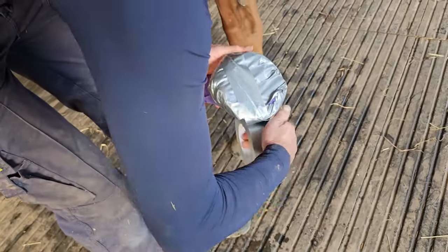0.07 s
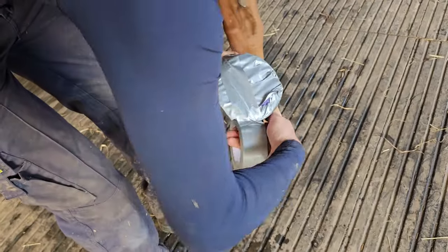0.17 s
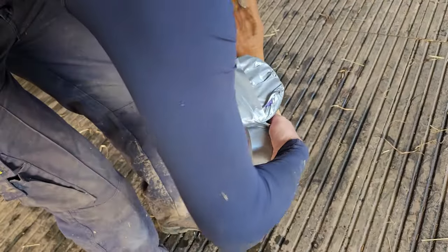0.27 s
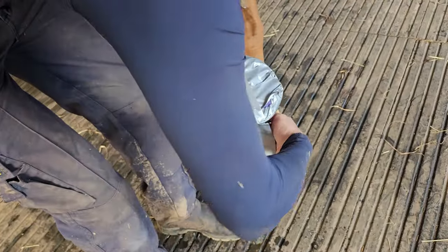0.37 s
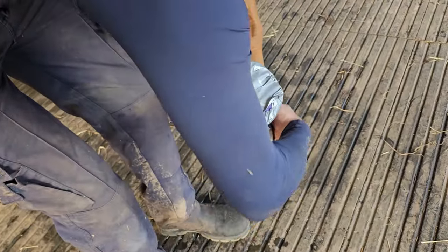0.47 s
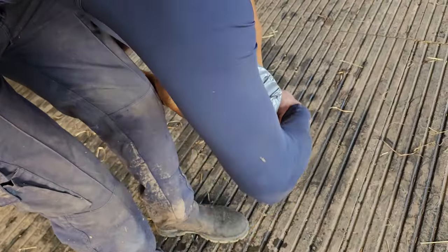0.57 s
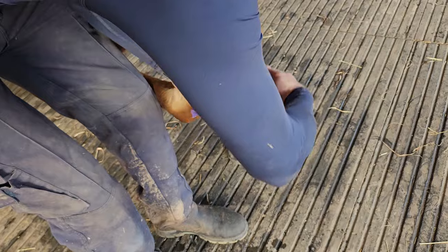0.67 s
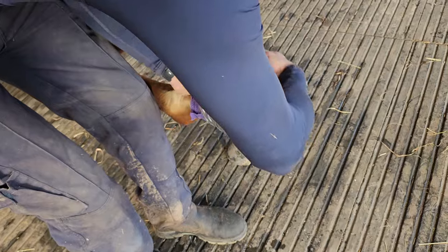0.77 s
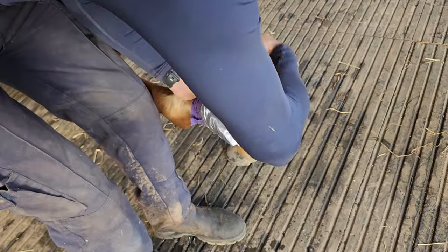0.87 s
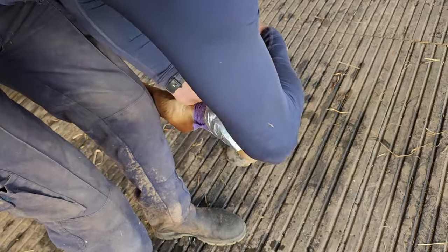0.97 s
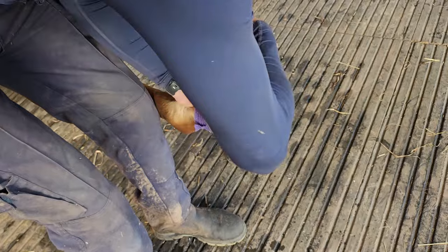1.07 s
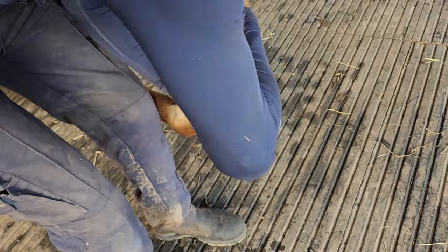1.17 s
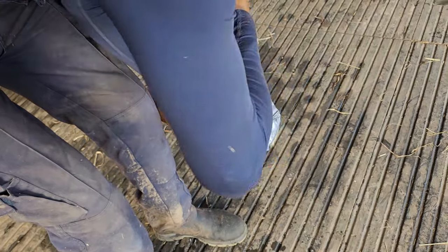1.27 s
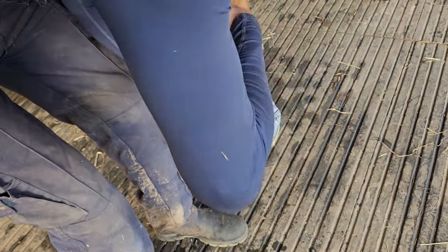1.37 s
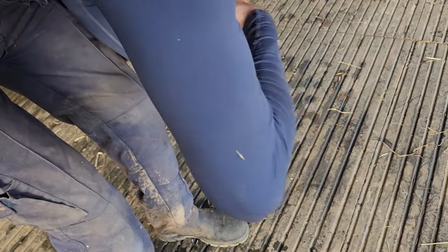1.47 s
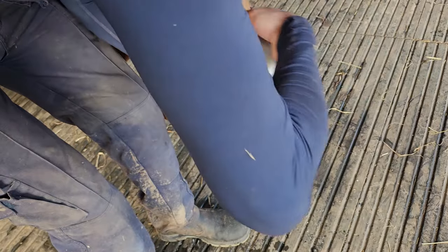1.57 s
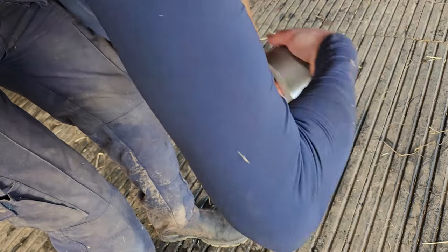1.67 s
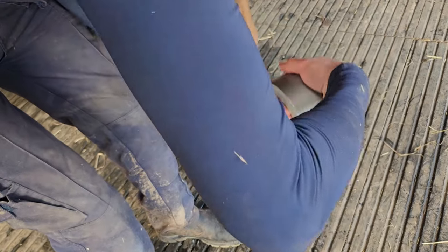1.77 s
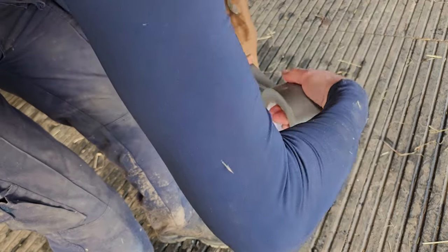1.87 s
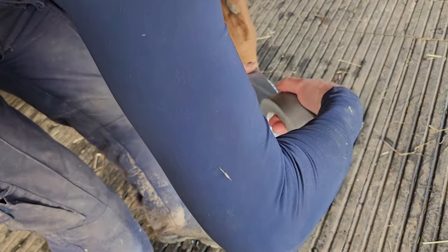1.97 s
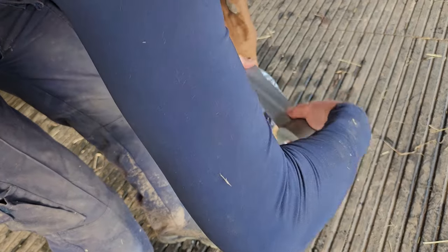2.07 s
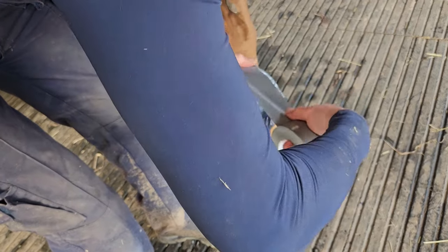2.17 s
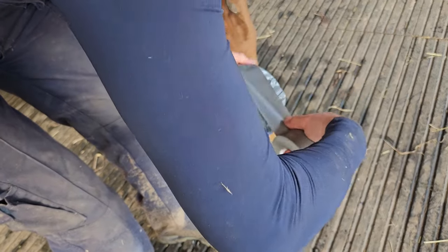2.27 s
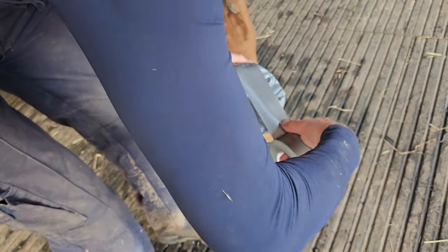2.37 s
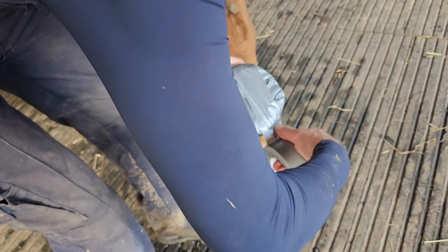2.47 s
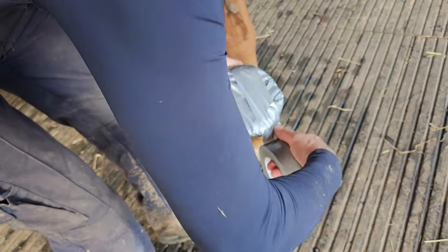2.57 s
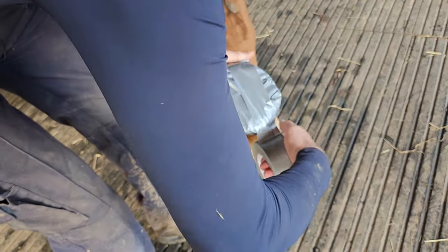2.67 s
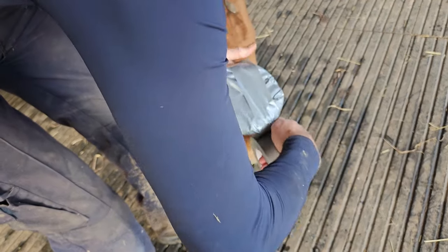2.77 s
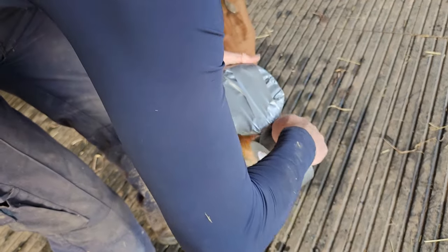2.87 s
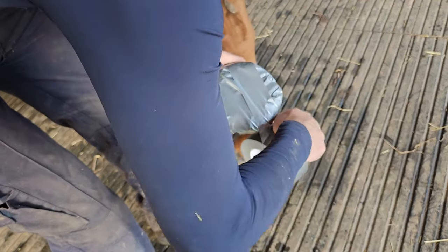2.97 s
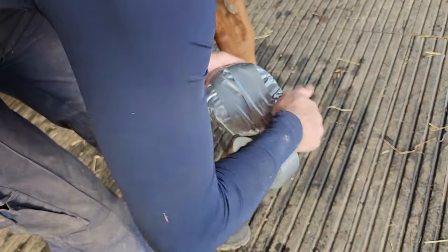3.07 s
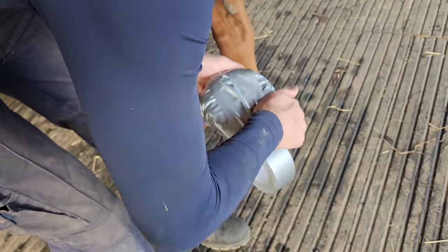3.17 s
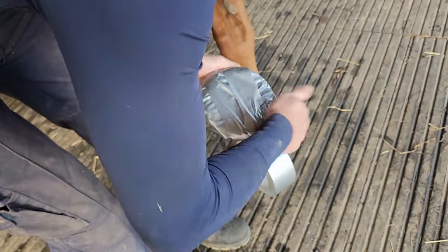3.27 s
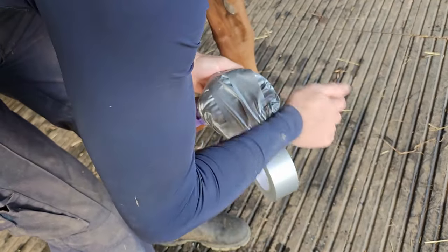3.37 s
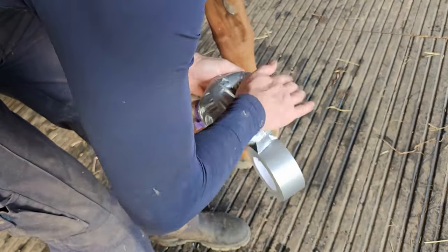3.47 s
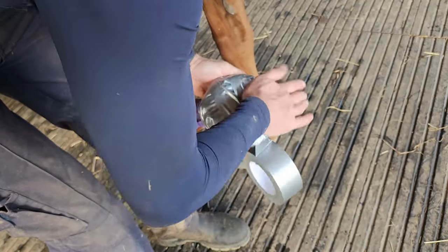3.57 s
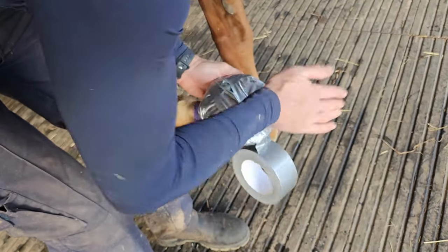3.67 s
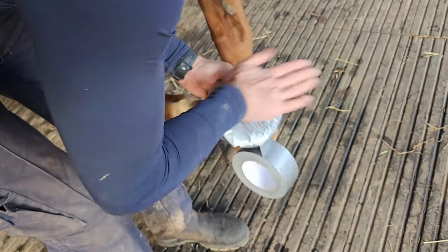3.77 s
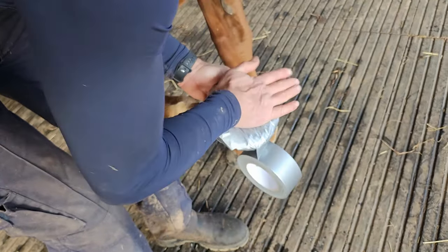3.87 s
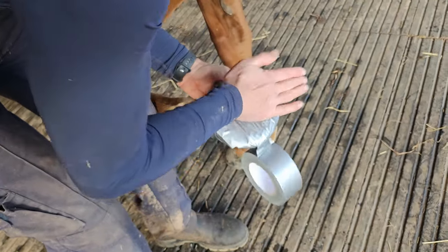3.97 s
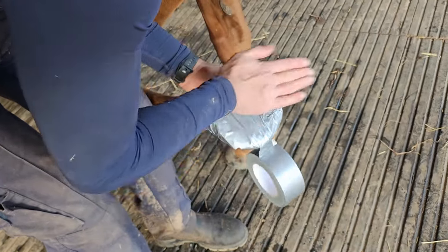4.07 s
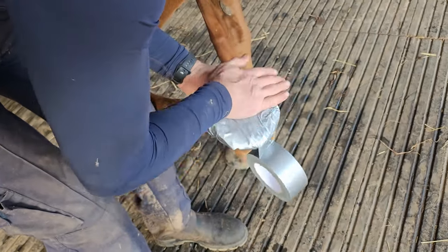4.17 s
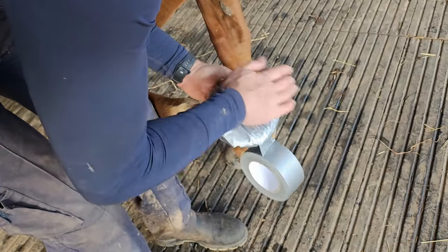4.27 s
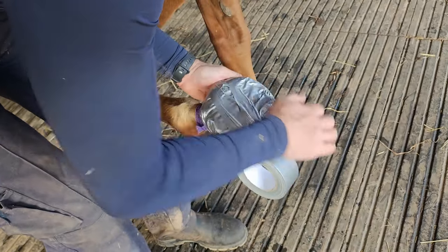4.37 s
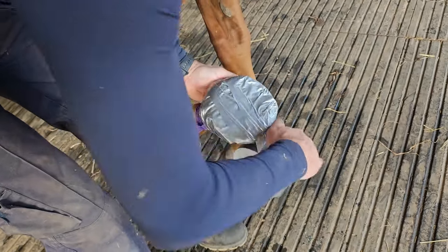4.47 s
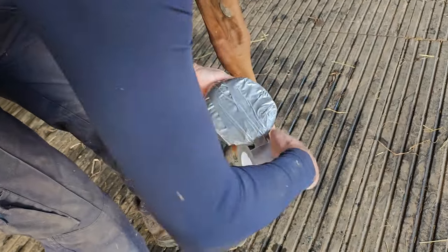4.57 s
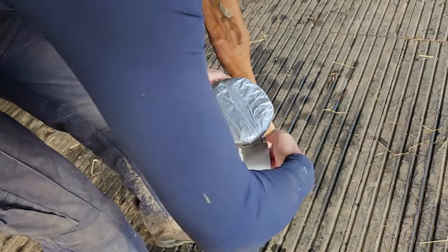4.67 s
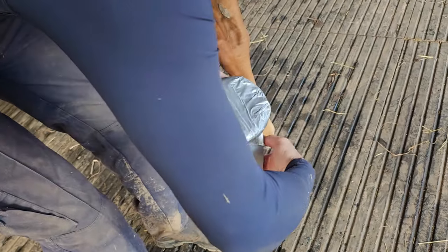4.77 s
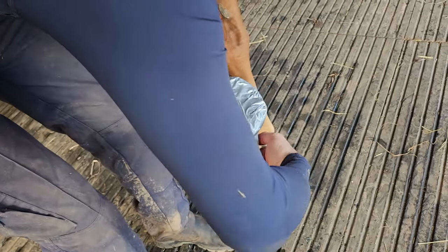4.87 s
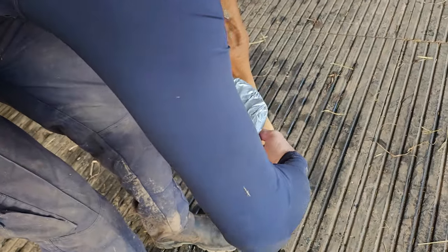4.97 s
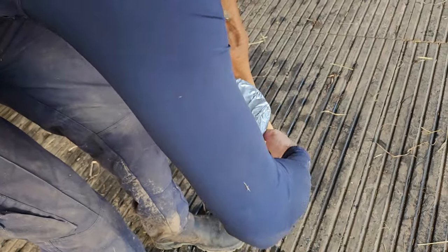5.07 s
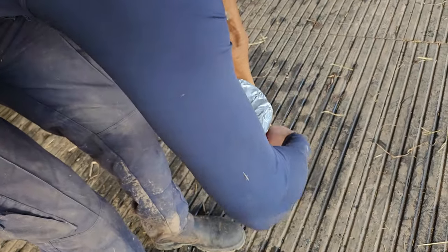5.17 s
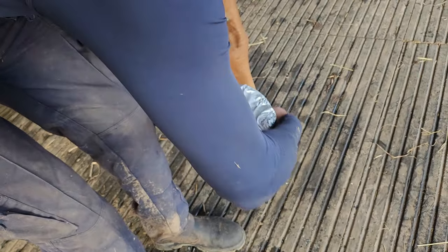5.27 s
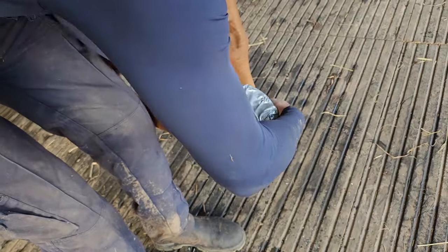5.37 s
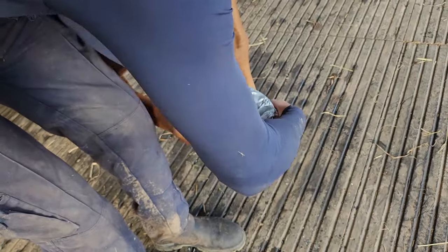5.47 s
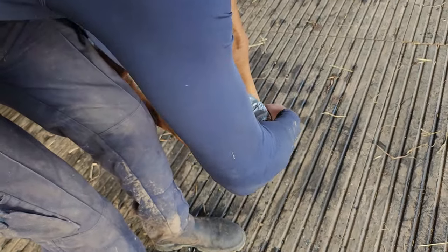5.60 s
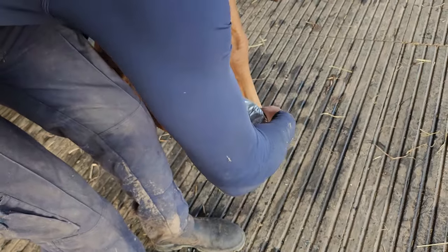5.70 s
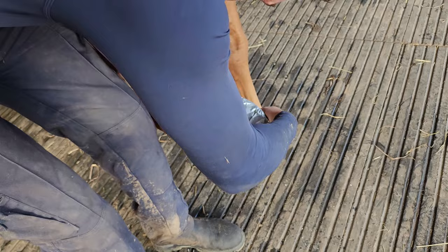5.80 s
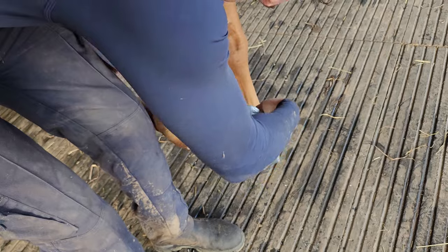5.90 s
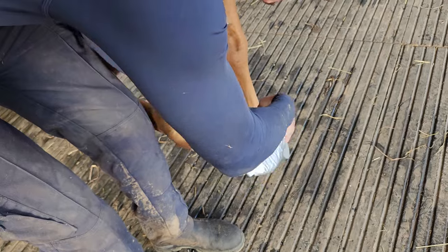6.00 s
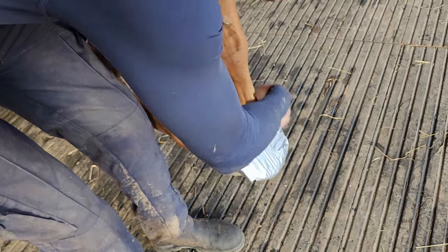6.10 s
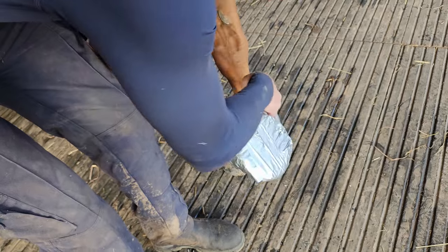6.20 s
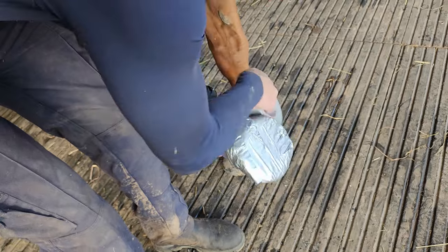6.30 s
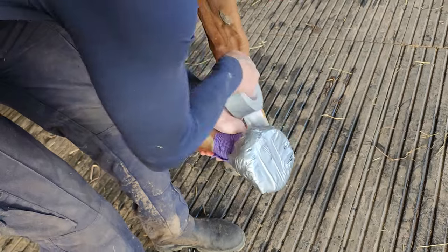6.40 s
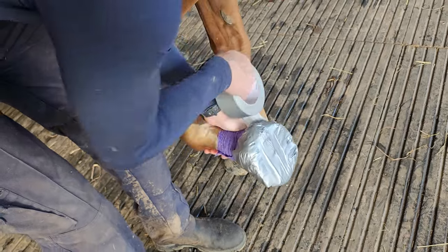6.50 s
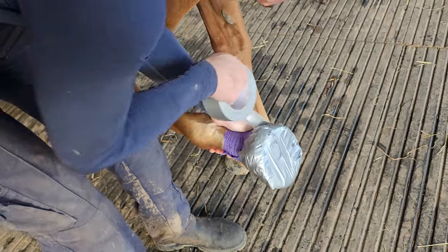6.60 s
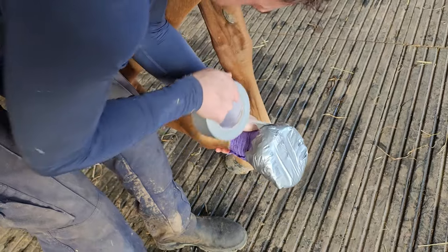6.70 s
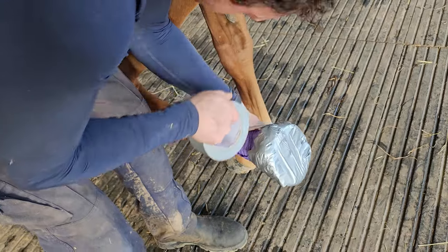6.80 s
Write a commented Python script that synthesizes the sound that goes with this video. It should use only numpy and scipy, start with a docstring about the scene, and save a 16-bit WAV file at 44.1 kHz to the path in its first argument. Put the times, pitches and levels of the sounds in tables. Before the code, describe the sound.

Duct tape is pulled off a roll in short rasping strips and wound around a horse's hoof, with a few palm pats.

```python
"""Rasping strips of duct tape are pulled off the roll and wound round a horse's hoof, close by in a stable.
The glue lets go by stick-slip: each slip plucks the taut strip, shakes the hollow roll and snaps a spray
of glue threads. Between pulls the tape crinkles, a palm pats it down on the hoof, fingers rub and
sleeves rustle. The stable reverberates over a faint hush from the yard."""
import sys
import numpy as np
from scipy import signal
from scipy.fft import rfft, irfft
from scipy.io import wavfile

SR = 44100
rng = np.random.default_rng(int(sys.argv[2]) if len(sys.argv) > 2 else 0)


def digitize_waveform(pressure):
    """Quantize a signal to 16-bit integers and store it at the path in sys.argv[1].

    Rows of a 2-D input are taken as channels; values are limited to [-1, 1].
    """
    field = np.atleast_2d(pressure).T
    bounded = np.clip(field, -1, 1)
    quanta = np.round(bounded * 32767).astype(np.int16)
    wavfile.write(sys.argv[1], SR, quanta)


N = 301644


def amp(db):
    return 10 ** (np.asarray(db) / 20)


def read(points, hz):
    """Interpolation of a curve along a logarithmic frequency axis."""
    freqs, values = np.transpose(points)
    return np.interp(np.log(hz + 1), np.log(freqs + 1), values)


def unit_rms(x):
    return x / np.sqrt(np.mean(x ** 2) + 1e-20)


def add(mix, start_s, sound):
    """Superposition: a sound joins the mix at start_s."""
    part = mix[:, max(round(start_s * SR), 0):][:, :sound.shape[1]]
    part += sound[:, :part.shape[1]]


def colour(x, spectrum, size=2048):
    """Minimum-phase filtering shapes the spectrum while clicks keep their sharp front."""
    log_gain = np.log(amp(read(spectrum, abs(np.fft.fftfreq(size, 1 / SR)))))
    taps = np.fft.ifft(np.exp(np.conj(signal.hilbert(log_gain)))).real[:size // 2]
    return signal.fftconvolve(x, taps[None], axes=1)[:, :x.shape[1]]


def noise(length, spectrum):
    """Filtered white noise in two rows: mid and side, like all sources here."""
    return colour(rng.standard_normal((2, length)), spectrum)


def wander(length, per_s):
    """Random modulation: straight lines between Gaussian values, per_s of them a second."""
    at = np.arange(length) * per_s / SR
    count = int(at[-1]) + 2
    return np.interp(at, np.arange(count), rng.standard_normal(count))


def resonate(x, hz, width_hz):
    """A damped resonator whose natural frequency follows the curve hz."""
    phasor = np.exp(2j * np.pi * np.cumsum(hz) / SR)
    pole = np.exp(-np.pi * width_hz / SR)
    return 2 * (phasor * signal.lfilter([1 - pole], [1, -pole], x / phasor + 1e-18)).real


def comb(x, lag_s, strength, count=1):
    """Interference with ever fainter repeats at a moving delay makes a sliding comb filter."""
    index = np.arange(x.shape[1])
    delayed = lambda lag: np.array([np.interp(index - lag * SR, index, row, left=0) for row in x])
    return x + sum(strength ** k * delayed(k * lag_s) for k in range(1, count + 1))


def spray(kicks, decay_s, smooth, grain_db=2.5):
    """Exponential decay: each kick leaves a cloud of tiny snaps; the share smooth of the power is steady."""
    pole = np.exp(-1 / (decay_s * SR))
    power = signal.lfilter([1 - pole], [1, -pole], kicks ** 2)
    grains = rng.standard_normal((2, len(kicks))) * amp(grain_db * rng.standard_normal(len(kicks)))
    return unit_rms(grains) * np.sqrt((1 - smooth) * power + smooth * np.mean(kicks ** 2))


# spectrum of the yard's hush: frequency_hz, gain_db
YARD_SPECTRUM = [(18, -34), (30, -3), (95, -0.5), (449, -18), (1350, -5.5), (1810, -14.5), (2410, -11),
                 (9710, -21.5), (12600, -12), (16000, -27)]
def yard_hush(level_db=-62):
    """Stationary noise: the faint steady hush of the yard."""
    return amp(level_db) * unit_rms(noise(N, YARD_SPECTRUM))


# reverberation time of the stable: frequency_hz, t60_s
STABLE_DECAY = [(100, 0.32), (500, 0.91), (2000, 0.68), (5000, 0.69), (9000, 0.59), (16000, 0.38)]
# colour of its echoes: frequency_hz, gain_db
STABLE_SPECTRUM = [(80, 3), (250, -0.5), (500, -1.5), (1000, -5), (2200, 4), (5000, 1), (8000, -4),
                   (12000, -2), (16000, 1)]
def stable_response(echoes_per_s=5000, gap_s=.003, build_up_s=0.00067):
    """A diffuse field: dense echoes of random sign build up, then are absorbed band by band."""
    taps = rng.choice([-1., 1.], (2, SR)) * (rng.random((2, SR)) < echoes_per_s / SR)
    hz, t, bands = signal.stft(taps, SR, nperseg=256)
    decay = amp(-60 * t / read(STABLE_DECAY, hz)[:, None])
    tail = signal.istft(bands * decay, SR, nperseg=256)[1]
    tail *= 1 - np.exp(-np.maximum(np.arange(tail.shape[1]) / SR - gap_s, 0) / build_up_s)
    return colour(tail / np.linalg.norm(tail[0]), STABLE_SPECTRUM)


def stable_reverb(x, gain_db=-9.0, paths=3):
    """Directivity: successive snaps radiate in different directions and so find different echo paths."""
    angle = np.pi * 130 * np.arange(N) / SR
    room = np.zeros((2, N))
    for k in range(paths):
        share = np.cos(angle + np.pi * k / paths) * np.sqrt(2 / paths)
        room += signal.oaconvolve((x[0] * share)[None], stable_response(), axes=1)[:, :N]
    return amp(gain_db) * room


def swells(rows, rest_db):
    """Incoherent addition: half-sine movements sum in power over hands that are never quite still."""
    t = np.arange(N) / SR
    power = sum((amp(db) * np.sin(np.pi * np.clip((t - start_s) / length_s, 0, 1))) ** 2
                for start_s, length_s, db in rows)
    return np.sqrt(power + amp(rest_db) ** 2)


# swings of the arm: start_s, length_s, peak_db
ARM_SWINGS = [(0.1, 0.21, -49), (2.15, 0.37, -52), (2.5, 0.58, -54.5), (3.23, 0.22, -48),
              (3.7, 0.18, -48.5), (3.91, 0.24, -43), (4.15, 0.2, -47), (4.85, 0.3, -48), (5.6, 0.18, -50.5),
              (5.92, 0.14, -46), (6.2, 1, -46.5)]
# spectrum of moving cloth: frequency_hz, gain_db
SLEEVE_SPECTRUM = [(20, -39), (45, -20.5), (75, 4.5), (115, -11.5), (180, 2.5), (280, -5.5), (420, -20.5),
                   (800, -19.5), (2500, -62)]
def sleeves(lumps_db=4.5):
    """Amplitude-modulated noise: sleeves rumble in lumps when an arm swings."""
    rumble = noise(N, SLEEVE_SPECTRUM) * amp(lumps_db * wander(N, 35))
    return unit_rms(rumble) * swells(ARM_SWINGS, rest_db=-70)


# hands smoothing the tape down: start_s, length_s, peak_db
FINGER_STROKES = [(0.4, 1.9, -41), (2.4, 0.4, -55.5), (3.2, 0.3, -61.5), (3.65, 0.19, -45.5),
                  (4.2, 0.22, -58.5), (4.54, 0.085, -55), (4.87, 0.21, -51), (5.93, 0.38, -47.5),
                  (6.1, 0.33, -39.5)]
# spectrum of skin sliding on tape: frequency_hz, gain_db
FINGER_SPECTRUM = [(150, -4), (450, -3), (800, -4), (1800, -2), (3200, -3), (5000, -2), (7500, -2.5),
                   (10000, -10), (12000, -5), (16000, -14)]
def fingers(ticks_per_s=90, tick_gain=0.76, spread_db=5.5):
    """Sliding friction: fingers hiss over the tape with small scattered ticks."""
    kicks = (rng.random(N) < ticks_per_s / SR) * amp(spread_db * np.minimum(rng.exponential(1, N), 3.5))
    hiss = rng.standard_normal((2, N))
    ticks = unit_rms(spray(kicks, decay_s=0.0032, smooth=0))
    rub = unit_rms(colour(hiss + tick_gain * ticks, FINGER_SPECTRUM))
    return rub * swells(FINGER_STROKES, rest_db=-63.5)


# palm on the taped hoof: start_s, slap_db, slap_time_s, thump_db, nominal_pitch_hz
HOOF_PATS = [(3.559, -32.5, 0.011, -25.5, 108), (3.899, -18, 0.004, -10, 146),
             (4.211, -24.5, 0.0049, -22, 120)]
# spectra of the palm's slap and the leg's shudder: frequency_hz, gain_db
SLAP_SPECTRUM = [(100, -4), (450, -9.5), (1000, -0.5), (2300, -6.5), (4000, -6.5), (7000, -13),
                 (10000, -17.5), (12000, -10), (16000, -25)]
SHUDDER_SPECTRUM = [(20, -9), (45, -12), (90, 10.5), (130, -10), (185, -5), (270, -4.5), (420, -20.5),
                    (900, -33.5)]
def pats(thump_decay_s=0.0043, sag_s=0.0065, shudder_db=-14.0, shudder_decay_s=0.045, give_s=.0013):
    """Damped impact: the palm slaps, the padding gives, the hoof thumps and the leg shudders briefly."""
    out, t = np.zeros((2, N)), np.arange(SR // 3) / SR
    onset = 1 - np.exp(-t / 0.002)
    for start_s, slap_db, slap_time_s, thump_db, nominal_hz in HOOF_PATS:
        age = 2 * t / slap_time_s
        slap = unit_rms(noise(len(t), SLAP_SPECTRUM)) * age * np.exp(1 - age)
        falling_hz = nominal_hz * (0.57 + np.exp(-t / sag_s))
        thump = 2 * np.sin(2 * np.pi * np.cumsum(falling_hz) / SR) * np.exp(-t / thump_decay_s)
        shudder = unit_rms(noise(len(t), SHUDDER_SPECTRUM)) * np.exp(-t / shudder_decay_s)
        add(out, start_s, amp(slap_db) * slap)
        add(out, start_s + give_s, amp(thump_db) * onset * (thump + amp(shudder_db) * shudder))
    return out


def stick_slip(length, slips_per_s):
    """Relaxation oscillation: the glue lets go in kicks at uneven gaps, larger where the gap is longer."""
    gap, size = rng.standard_normal((length // 20 + 2, 2)).T
    hold = np.exp(.5 * np.clip(gap, -2, 1.6))
    at = ((np.cumsum(hold) - hold[0]) * SR / slips_per_s).astype(int)
    strength = np.sqrt(hold) * amp(2.8 * np.clip(size, -1.5, 1.6))
    strength[0] = max(strength[0], 1.3)  # breaking free takes a firm kick
    kicks = np.zeros(length)
    kicks[at[at < length]] = strength[at < length]
    return kicks


# spectra of the free strip, the snapping glue threads and the hollow roll: frequency_hz, gain_db
STRIP_SPECTRUM = [(150, -50), (350, -7.5), (520, -6), (780, 3), (1500, 1.5), (1750, -1), (2800, 3),
                  (4000, 2.5), (6000, -0.5), (10000, -35.5)]
GLUE_SPECTRUM = [(1200, -24.5), (2800, -3.5), (4000, 2.5), (5200, 1.5), (7200, 3), (8800, 0.5), (10000, -6),
                 (11600, 4), (12700, -2.5), (14000, -3), (16000, -12.5)]
ROLL_SPECTRUM = [(60, -23.5), (130, 5.5), (200, 4), (380, -2.5), (560, -0.5), (1200, -1)]
def peel(course, slips_per_s, smooth, roll_hz=280, width_ratio=1.0):
    """Forced vibration: slips drive the free strip, the glue's fizz and the hollow roll."""
    # course: time_s, level_db, ring_hz, fizz_db, roll_db; the last two are gains relative to the strip
    times, *columns = np.transpose(course)
    length = max(int((times[-1] - times[0]) * SR), 64)
    ring_out = 1400  # samples
    t = times[0] + np.arange(length + ring_out) / SR
    level_db, ring_hz, fizz_db, roll_db = (np.interp(t, times, column) for column in columns)
    kicks = stick_slip(length, slips_per_s)
    plucks = kicks * np.array([[1], [0]])  # plucks are all mid, while the snaps scatter

    def snaps(pluck_gain):
        threads = spray(kicks, decay_s=.0007, smooth=np.clip(smooth, 0, 1))
        return np.pad(threads - pluck_gain * plucks, ((0, 0), (0, ring_out)))

    # the drive carries no deep bass below about 170 Hz
    tug = signal.sosfilt(signal.butter(3, 170, "high", fs=SR, output="sos"), snaps(0.87))
    ring = lambda hz, width_hz: resonate(resonate(tug, hz, width_hz), hz, width_hz)
    drift = lambda depth, per_s: np.exp(depth * wander(len(t), per_s))
    strip = colour(ring(ring_hz, width_ratio * ring_hz.mean()) + 0.34 * tug, STRIP_SPECTRUM)
    # standing waves along and across the strip drift with the tension, partly following the ring's glide
    stretch = (ring_hz[0] / ring_hz) ** .6
    along_s = rng.uniform(.0016, .0028) * drift(.04, 14) * stretch
    across_s = rng.uniform(.0009, .0014) * drift(.07, 14) * stretch
    strip = comb(strip, along_s, .36, count=2)
    strip = comb(strip, across_s, .25)
    fizz = comb(colour(snaps(.18), GLUE_SPECTRUM), along_s, .25)
    # a glancing echo off the moving arm sweeps a notch through the fizz
    fizz = comb(fizz, 8e-5 * drift(.45, 8), .3)
    # the roll's hollow note bends as the grip on it shifts
    roll = colour(ring(roll_hz * drift(.07, 10), width_hz=85), ROLL_SPECTRUM)
    unit = lambda x: x / np.sqrt(np.sum(x ** 2, 1, keepdims=True) / length + 1e-20)
    return amp(level_db) * (unit(strip) + amp(fizz_db) * unit(fizz) + amp(roll_db - 5.5) * unit(roll))


def focused(sound, focus_db):
    """Mid-side balance: raising mid over side by focus_db narrows the stereo image."""
    return sound * amp([[focus_db / 2], [-focus_db / 2]])


# tape creasing under the fingers: start_s, length_s, level_db, ring_hz, fizz_db
TAPE_CREASES = [(0.163, 0.0038, -54, 2980, 16.5), (2.72, 0.0055, -42, 1200, -0.5),
                (2.946, 0.0087, -47.5, 2480, -5), (3.1, 0.0061, -52, 2780, -22.5),
                (3.222, 0.01, -52, 1310, 3), (3.351, 0.0073, -52.5, 2300, 8.5),
                (3.363, 0.007, -44, 980, -0.5), (3.472, 0.006, -42.5, 2240, -11),
                (3.72, 0.0045, -37, 1420, -21), (3.947, 0.016, -32.5, 2360, 5),
                (4.029, 0.0026, -39.5, 2780, 7.5), (4.051, 0.0029, -36.5, 2570, -5),
                (4.293, 0.005, -42, 2400, -7), (4.373, 0.005, -44, 1710, -19),
                (4.738, 0.0079, -45.5, 2650, 1), (5.948, 0.0051, -47.5, 2800, 8.5),
                (6.019, 0.0073, -47.5, 2690, 6), (6.038, 0.0066, -49, 2600, 12)]
def crinkles(roll_db=-22):
    """Brief stick-slip: glue lets go in a crease and barely stirs the roll."""
    out = np.zeros((2, N))
    for start_s, length_s, level_db, ring_hz, fizz_db in TAPE_CREASES:
        course = [(s, level_db, ring_hz, fizz_db, roll_db) for s in (start_s, start_s + length_s)]
        add(out, start_s, peel(course, slips_per_s=380, smooth=0.55))
    return out


# jerks on the tape: start_s, length_s, level_db, ring_hz, width_ratio, fizz_db, roll_db, focus_db
SHORT_RIPS = [(0.041, 0.021, -40, 2720, .9, 7, -37, -3), (0.087, 0.011, -32.5, 2630, .9, 1, -19, 0),
              (0.192, 0.011, -28, 4100, 0.5, 2.5, -19, -3), (0.331, 0.028, -44, 2820, 1.1, 5, -30, -1),
              (0.384, 0.0043, -35, 3160, .6, -5, -24, -3), (0.598, 0.0056, -24, 2040, 1.3, 1, -11.5, 2),
              (1.12, 0.0031, -17.5, 2240, 1.5, -11.5, -34, 4),
              (1.241, 0.015, -18, 1990, 1.3, -0.5, -3.5, -3), (1.262, 0.0093, -21, 2460, 1.8, -2, -7, -2),
              (1.362, 0.0063, -24, 2320, 1, 0.5, -1, -2), (1.376, 0.017, -24, 1840, 1, -5, 1.5, -3),
              (1.395, 0.004, -17.5, 2250, 0.77, -7, -9.5, 0), (1.473, 0.0092, -25, 2690, 0.87, 1, -4.5, 1),
              (1.48, 0.01, -17.5, 2740, 0.59, -7, -13, 0.5),
              (1.513, 0.029, -17.5, 2140, 0.44, -8.5, -8.5, -2),
              (1.557, 0.031, -21.5, 1950, 0.85, -3.5, -0.5, 0), (1.595, 0.0058, -24, 1970, 1, -0.5, -1, 1),
              (1.628, 0.0057, -22, 1580, 1.8, -2.5, -8.5, -2), (1.658, 0.0032, -22, 1600, 1.5, 0, -3, -2),
              (1.809, 0.009, -21, 1890, 2.1, -2.5, -0.5, -3), (2.083, 0.005, -23, 1070, .9, -3.5, -11, -3),
              (2.157, 0.014, -22.5, 4160, 0.89, -12, -9.5, 2.5), (2.841, 0.03, -39, 1060, 1.1, 1, -16, -3),
              (2.875, 0.008, -29, 940, 1.5, -1, -25, -5), (4.866, 0.004, -27, 2040, 0.78, 8.5, -19, -0.5),
              (4.9, 0.013, -23.5, 2580, 0.94, 5, -21, -1.5),
              (4.925, 0.006, -20.5, 2450, 0.93, 3.5, -29, -2),
              (5.155, 0.009, -19.5, 1730, 2.1, 0.5, -25, -1.5),
              (5.209, 0.011, -17.5, 1800, 1.6, -16, -22, 1),
              (5.422, 0.031, -30.5, 1600, 0.85, -2.5, -14.5, 3.5),
              (6.491, 0.029, -33.5, 1200, 0.55, 3, 3, 3.5), (6.519, 0.031, -25.5, 2030, 0.56, -6, -2, 1)]
def rips(gain_db=1.0, fade_db=3, attack_s=0.0013, attack_db=9.5, settle_s=0.12):
    """Stress release: a few slips catch, then weaken as tension is spent; longer rips peel more smoothly."""
    out, progress = np.zeros((2, N)), np.linspace(0, 1, 20)
    for start_s, length_s, level_db, ring_hz, width_ratio, fizz_db, roll_db, focus_db in SHORT_RIPS:
        t = progress * length_s
        # the first threads give way before the glue breaks free
        envelope_db = level_db + fade_db * (.5 - progress) - attack_db * np.exp(-t / attack_s)
        course = [(s, db, ring_hz, fizz_db, roll_db) for s, db in zip(start_s + t, envelope_db)]
        rasp = peel(course, slips_per_s=420, smooth=length_s / settle_s, width_ratio=width_ratio)
        add(out, start_s, amp(gain_db) * focused(rasp, focus_db))
    return out


# strokes of the arm: start_s, length_s, peak_db, crest_fraction, drop_db, ring_start_hz, ring_end_hz,
# width_ratio, fizz_db, roll_db, roll_hz, smooth_fraction, focus_db
LONG_PULLS = [(0.394, 0.21, -21.5, 0.43, 13, 2780, 1070, 1.37, 2, -13, 359, 0.67, -1),
              (0.639, 0.16, -22.5, 0.04, 3, 1440, 2330, 1.9, -1.5, -7.5, 263, .6, 1),
              (0.801, 0.28, -21, 0.75, 3, 1810, 2340, 1.25, -1, -18.5, 281, 0.67, 1.2),
              (1.152, 0.08, -18.5, 0.92, 4.5, 2510, 1980, 1.34, -5.5, -14.5, 271, 1, 0.5),
              (1.672, 0.126, -24.5, 0.32, 1.5, 920, 1080, 2.5, 0, -7, 272, 0.48, -0.5),
              (2.087, 0.094, -20.5, 0.19, 4.5, 1190, 1075, 1.22, 1, -10.5, 187, .5, -1.5),
              (5.201, 0.187, -23.5, 0.4, 7, 1890, 1246, 1.4, 4.5, -10.5, 369, 0.6, 1),
              (6.11, 0.18, -28, 0.41, 8.5, 2120, 1600, 0.91, 4.5, -10, 293, 0.95, 0.6),
              (6.386, 0.16, -24, 0.82, 6, 3150, 1815, 0.95, 3.5, -14.5, 240, 0.65, -0.8),
              (6.636, 0.18, -23, 0.69, 14, 2840, 1057, 2.06, 0.5, -10.5, 286, 0.63, -0.9)]
def pulls(gain_db=1.43, rise_db=6, arch=1.08, attack_s=0.0042, attack_db=4, boom_growth_db=13):
    """Sustained stick-slip: level arches with arm speed; the ring glides as the strip changes length."""
    out = np.zeros((2, N))
    for (start_s, length_s, peak_db, crest, drop_db, start_hz, end_hz,
         width_ratio, fizz_db, roll_db, roll_hz, smooth, focus_db) in LONG_PULLS:
        progress = np.linspace(0, 1, int(length_s * SR))
        t = progress * length_s
        before = np.maximum(1 - progress / crest, 0)
        after = np.maximum((progress - crest) / (1 - crest), 0)
        level_db = peak_db - rise_db * before ** arch - drop_db * after ** arch
        level_db -= attack_db * np.exp(-t / attack_s)
        level_db += 1.35 * wander(len(t), 88.5)  # the glue holds unevenly along the tape
        ring_hz = start_hz * (end_hz / start_hz) ** progress
        swing = progress - .5  # the roll booms more as the arm comes round
        course = [start_s + t, level_db, ring_hz, fizz_db - 0.5 * swing, roll_db + boom_growth_db * swing]
        rasp = peel(np.transpose(course), slips_per_s=350, smooth=smooth,
                    roll_hz=roll_hz, width_ratio=width_ratio)
        add(out, start_s, amp(gain_db) * focused(rasp, focus_db))
    return out


# likeness of left and right for direct and for reverberant sound: frequency_hz, correlation
DIRECT_COHERENCE = [(200, .99), (550, .98), (1000, .85), (2400, .68), (5000, .3), (8500, .45), (12500, .6)]
DIFFUSE_COHERENCE = [(150, 0.79), (400, 0.87), (1000, 0.015), (2400, -0.12), (5000, -0.014), (8500, 0.93),
                     (12500, 0.8)]
# level difference between the sides: frequency_hz, left_minus_right_db
STEREO_BALANCE = [(100, -1), (500, 2.5), (1100, 1.5), (2400, -3), (4000, -2), (6200, -1.5), (8200, -8.5),
                  (10000, -3), (12000, -8), (14000, -0.5), (15500, -5)]
def stereo(pair, coherence):
    """Sum and difference of mid and side give left and right, with coherence set by frequency."""
    hz = np.fft.rfftfreq(N, 1 / SR)
    correlation = read(coherence, hz)
    mid, side = rfft(pair) * np.sqrt([(1 + correlation) / 2, (1 - correlation) / 2])
    lean = amp(read(STEREO_BALANCE, hz))
    return irfft(np.array([(mid + side) * lean, mid - side]) * np.sqrt(2 / (1 + lean ** 2)), N)


def scene(hoof_send=.45):
    """Acoustic shadow: the body shields the hoof, so the pats stir the room less than the tape does."""
    open_sound = pulls() + rips() + crinkles() + sleeves() + fingers()
    on_hoof = pats()
    diffuse = stable_reverb(open_sound + hoof_send * on_hoof) + yard_hush()
    return stereo(open_sound + on_hoof, DIRECT_COHERENCE) + stereo(diffuse, DIFFUSE_COHERENCE)


def record(dry):
    """Soft saturation rounds the sharpest peaks; a low-pass filter limits the band."""
    rounded = dry / (1 + dry ** 6) ** (1 / 6)
    low_pass = signal.firwin(401, 16100, window=("kaiser", 9), fs=SR)
    return signal.oaconvolve(rounded, low_pass[None], "same")


dry = scene()
out = record(dry)
digitize_waveform(out)
```